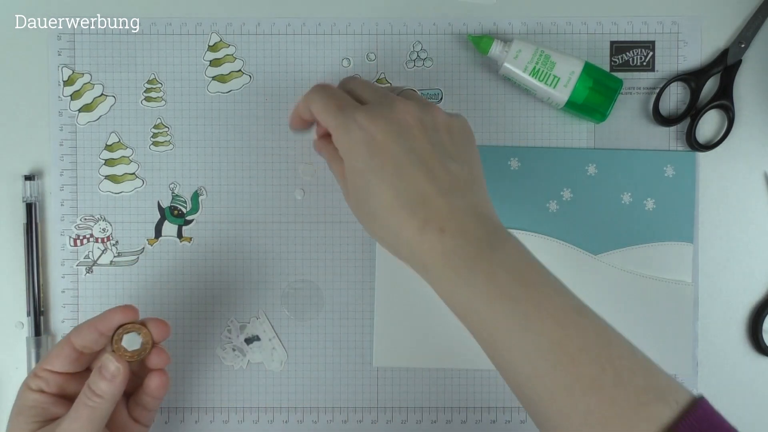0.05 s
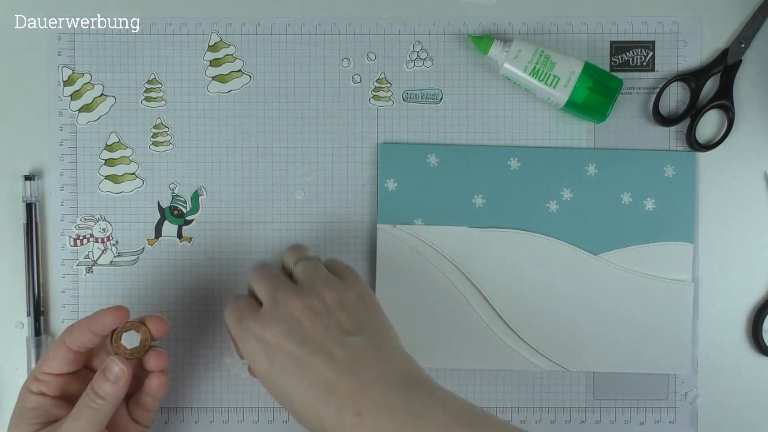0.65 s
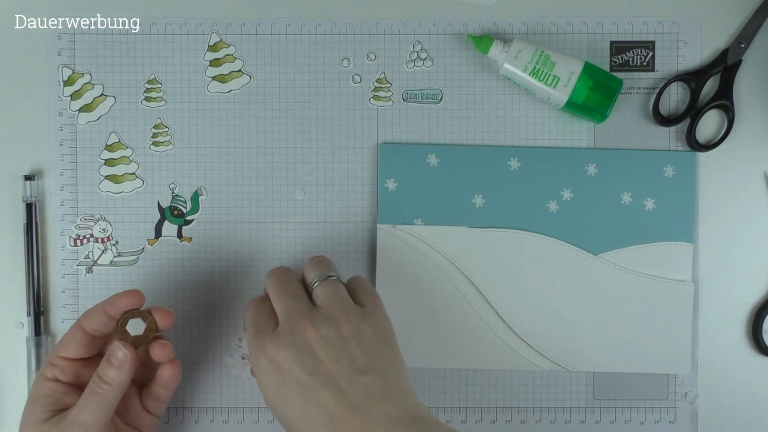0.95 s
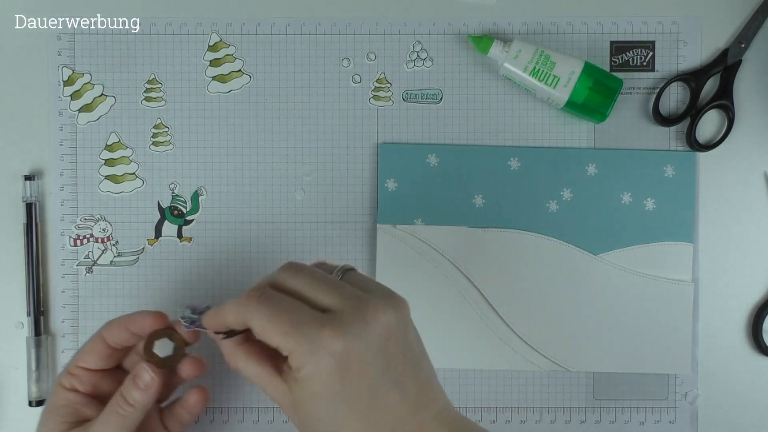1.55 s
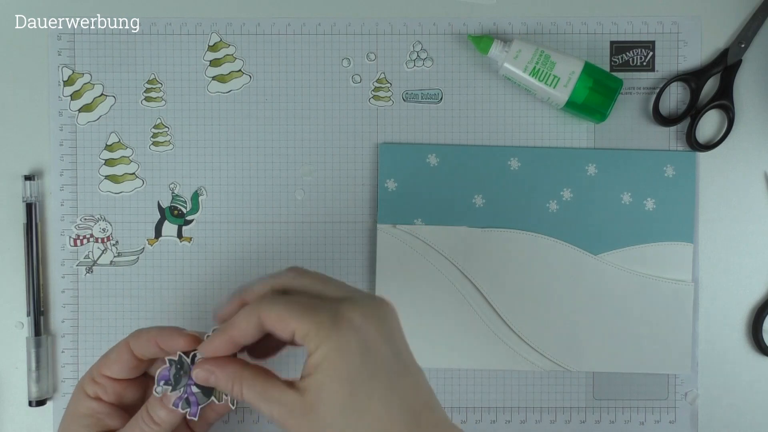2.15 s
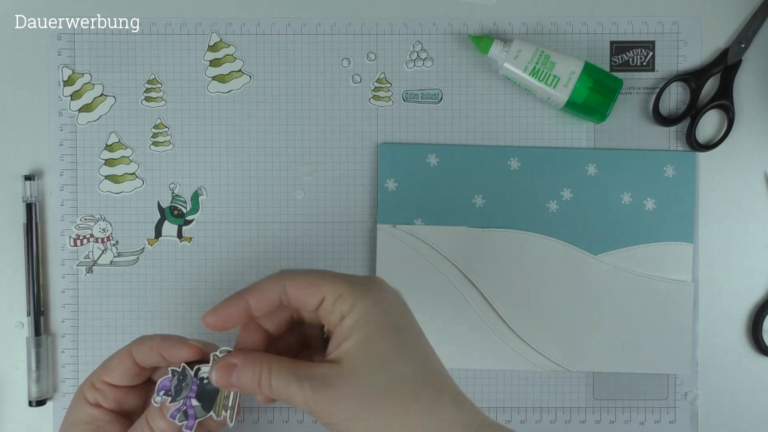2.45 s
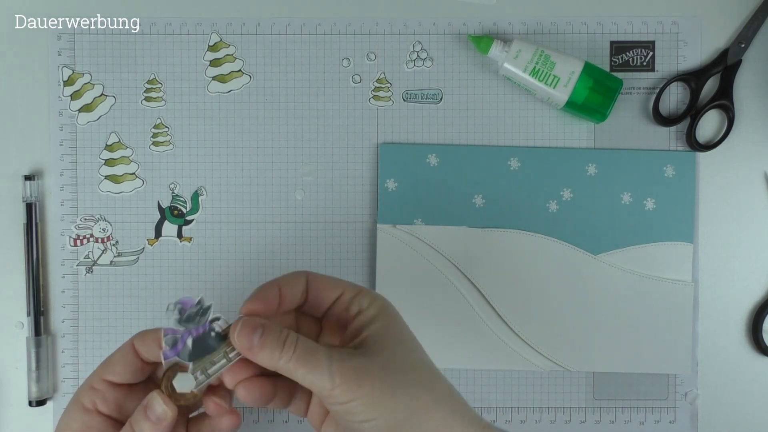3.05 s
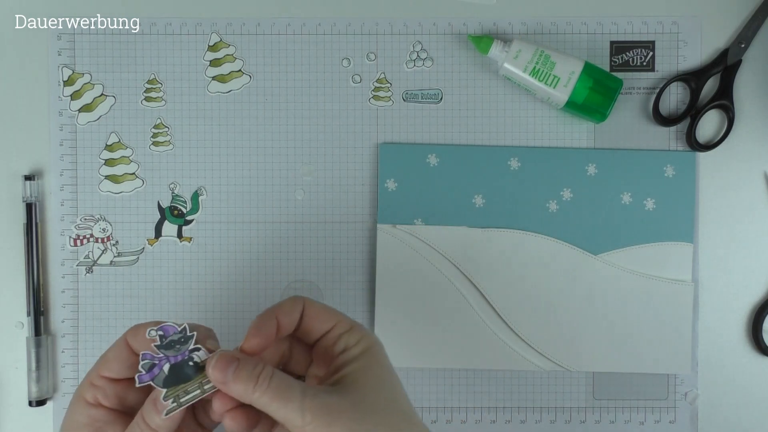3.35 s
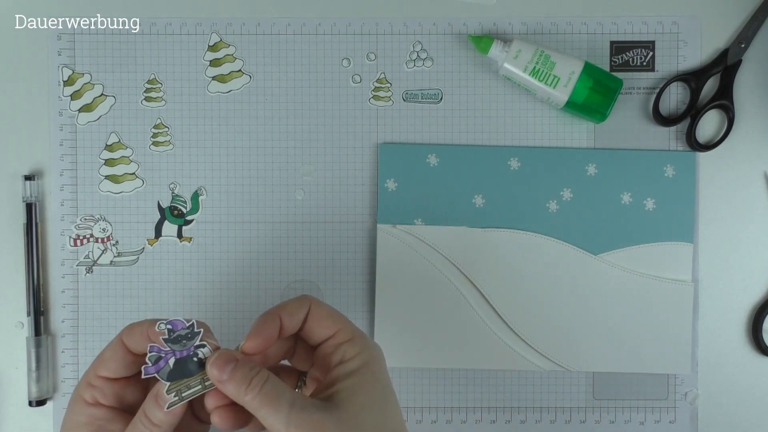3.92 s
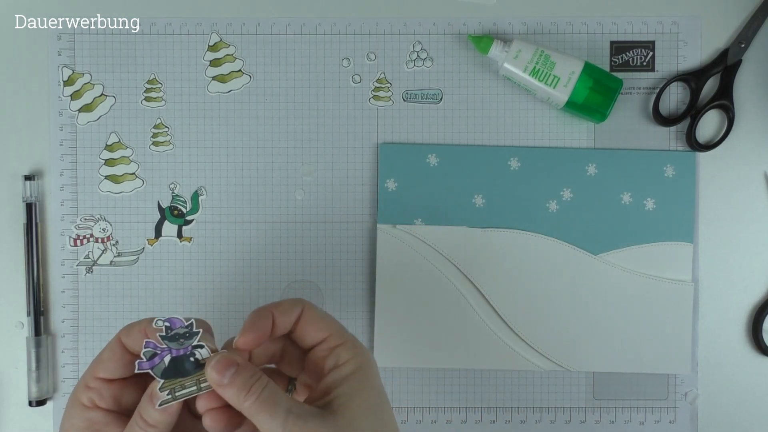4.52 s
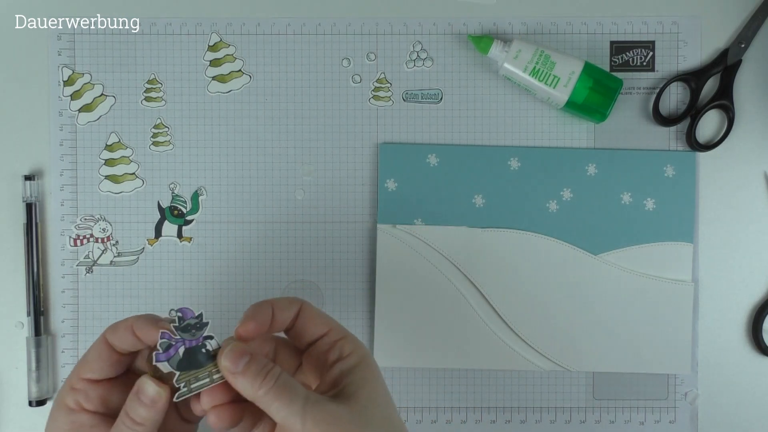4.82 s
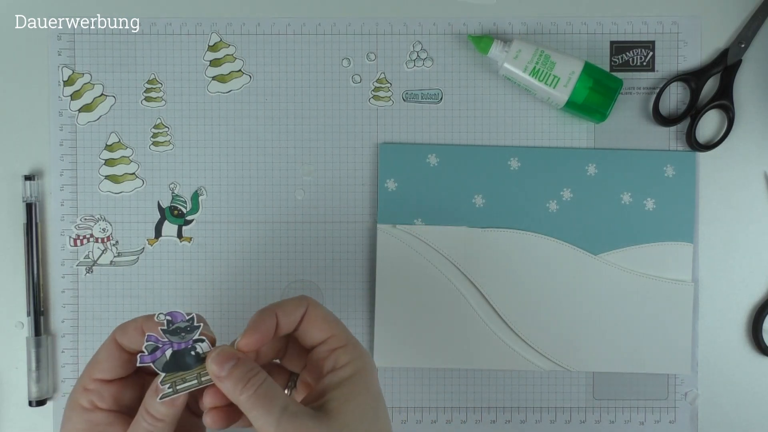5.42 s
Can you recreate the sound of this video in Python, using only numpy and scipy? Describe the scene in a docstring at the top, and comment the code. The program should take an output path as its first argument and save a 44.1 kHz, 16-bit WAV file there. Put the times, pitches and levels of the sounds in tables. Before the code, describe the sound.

A small piece of stiff card is handled up close in a quiet room with a faint low hum. First come dull fingertip thumps on the desk and two crisp snaps, the second louder. Then card and skin rub, tick and tap lightly, with further snaps. After a near-still stretch, a few sharp clicks land together with soft thuds.

```python
"""Card cutout on a craft mat

Close up, hands pick a small card cutout off a craft mat and press it onto a coin-sized disc.
Fingers bump and drag on the desk, card and skin rub, tick and tap, and the stiff card snaps
off a fingernail, ringing in its bending modes. Hands and desk scatter the card's sounds at once;
a small quiet room with a low rumble answers faintly."""
import sys
import numpy as np
from scipy import signal
from scipy.fft import rfft, irfft
from scipy.io import wavfile

SR = 44100
rng = np.random.default_rng(int(sys.argv[2]) if len(sys.argv) > 2 else 0)


def persist_wave(psi):
    """Save psi, clipped to +-1, as 16-bit WAV."""
    counts = np.round(np.clip(psi, -1, 1) * 32767).astype(np.int16)
    wavfile.write(sys.argv[1], SR, np.atleast_2d(counts).T)


N = 246078


def amp(db):
    """Decibels to gain."""
    return 10 ** (np.asarray(db) / 20)


def unit_rms(x):
    """Scales to an rms of one."""
    return x / np.sqrt(np.mean(x ** 2) + 1e-20)


def curve(points, hz):
    """Reads a curve along a log-frequency axis."""
    f, value = np.transpose(points)
    return np.interp(np.log(hz + 1), np.log(f + 1), value)


def add(mix, start_s, sound):
    """Drops a sound into the mix."""
    part = mix[round(start_s * SR):][:len(sound)]
    part += sound[:len(part)]


def bins(size=4096):
    """Frequencies on which the tone colours are drawn."""
    return np.fft.rfftfreq(size, 1 / SR)


def resonance(hz, centre, width):
    """Power response of one mode, one at its centre."""
    return (hz * width) ** 2 / ((hz ** 2 - centre ** 2) ** 2 + (hz * width) ** 2)


def impulse(power, size=2048):
    """The sharp-fronted (minimum-phase) click with this power spectrum."""
    log_gain = np.log(power / power.max() + 1e-9) / 2
    mirrored = np.concatenate([log_gain, log_gain[-2:0:-1]])
    spectrum = np.exp(np.conj(signal.hilbert(mirrored)))
    return irfft(spectrum[:len(power)])[:size]


def dulled(x, corner_hz):
    """Reflections lose their highest treble."""
    return signal.lfilter(*signal.butter(2, corner_hz, fs=SR), x)


def scattered_click(power, scatter_db, fade_s):
    """A click and its dense reflections off hands and desk."""
    click = impulse(power)
    t = np.arange(len(click)) / SR
    reflections = rng.choice([-1., 1.], len(t)) * (1 + t / fade_s) ** -1.5 * (t > .0004)
    echoes = dulled(signal.fftconvolve(click, reflections)[:len(t)], corner_hz=12000)
    sound = unit_rms(click) + amp(scatter_db) * unit_rms(echoes)
    return sound / np.linalg.norm(sound) * np.sqrt(SR / 1000)  # the energy of 1 ms at rms one


def cupped(x, echo_db=-4, fade_s=0.00096):
    """Reflections between cupped hands and desk; the hands move, so each stroke has its own ripple."""
    t = np.arange(512) / SR
    echoes = rng.standard_normal(len(t)) * np.exp(-t / fade_s) * (t > .0003)
    response = (t == 0) + amp(echo_db) * echoes / np.linalg.norm(echoes)
    return signal.fftconvolve(x, response / np.linalg.norm(response))


def friction(start, peak, end, slips_per_s, spread_db, hiss_gain, skew=1):
    """Tiny slips of uneven size over a smooth hiss, swelling to a peak and easing off."""
    t = np.arange(start, max(end, start + .005), 1 / SR)
    hiss = rng.standard_normal(N)[:len(t)]
    slipping = rng.random(N)[:len(t)] < slips_per_s / SR
    size = np.minimum(rng.standard_exponential(N)[:len(t)], 4)
    slips = np.sign(hiss) * slipping * amp(spread_db * size)
    ramp = np.interp(t, [start, peak, end], [0, 1, 0])
    speed = np.sin(np.pi / 2 * ramp ** skew) ** 2
    return unit_rms(unit_rms(slips) + hiss_gain * hiss) * speed


def through_body(force, power):
    """Plays a force through a body of the given power spectrum, keeping its level."""
    body = impulse(power)
    return signal.fftconvolve(force, body / np.linalg.norm(body))


# The room tone's colour. Each row: frequency in Hz, relative spectral level in dB.
ROOM_TONE_COLOUR = [(8.8, -24.5), (15, 3), (123, -10.5), (155, -10.5), (330, -18), (417, -19.5),
                    (483, -22.5), (628, -24), (685, -24.5), (1790, -32.5), (1960, -31.5), (2140, -32.5),
                    (4310, -36), (6110, -37.5), (16000, -44)]


def room_tone(level_db=-50.5):
    """A steady bed of room rumble and microphone hiss."""
    spectrum = rfft(rng.standard_normal(N)) * amp(curve(ROOM_TONE_COLOUR, bins(N)))
    return amp(level_db) * unit_rms(irfft(spectrum, N))


# The small room's decay. Each row: frequency in Hz, seconds to fall 60 dB.
ROOM_DECAY = [(200, 0.33), (1000, 0.28), (5000, 0.31), (9000, 0.33), (15000, 0.45)]


def room_reverb(x, build_s=0.0046):
    """A diffuse tail in which each band dies at its own speed."""
    hz, t, noise = signal.stft(rng.standard_normal(SR // 2), SR, nperseg=256)
    decay = amp(-60 * t / curve(ROOM_DECAY, hz)[:, None])
    tail = signal.istft(noise * decay, SR, nperseg=256)[1]
    tail *= np.minimum(np.arange(len(tail)) / SR / build_s, 1) ** 2
    return signal.fftconvolve(x, tail / np.linalg.norm(tail))[:N]


# The desk top's ring. Each row: frequency in Hz, relative level in dB, seconds to fall 60 dB.
DESK_RING = [(64.5, -12.5, .3), (104, -1.5, .07), (186.7, -2.5, 0.034), (262, -5, 0.093), (420, -1, .04)]
# Hands bump the desk. Each row: start in seconds, peak level in dB, contact time in seconds.
DESK_BUMPS = [(0.486, -28.5, 0.0019), (0.556, -35, 0.0034), (0.684, -32.5, 0.0006), (0.9432, -25, 0.00045),
              (1.01, -35, 0.0043), (1.2768, -28.5, 0.00021), (1.7820, -31.5, 0.00031),
              (4.706, -30.5, 0.00502), (4.74, -31, 0.0056)]


def desk_bumps():
    """Soft pushes ring the desk top; the longer the contact, the duller the thud."""
    out, t = np.zeros(N), np.arange(SR // 2) / SR
    ring = sum(amp(db - 60 * t / t60) * np.sin(2 * np.pi * f * t) for f, db, t60 in DESK_RING)
    for start, db, contact_s in DESK_BUMPS:
        push = t * np.exp(-4 * t / contact_s)
        thud = signal.fftconvolve(push, ring)[:len(t)]
        add(out, start, amp(db) * thud / abs(thud).max())
    return out


# The mat's body. Each row: frequency in Hz, width in Hz before widening, relative level in dB.
MAT_BODY = [(226.7, 53, -5.5), (405, 37, -0.5), (612, 120, -11.5), (940, 160, -15.5), (1155, 100, -14),
            (1750, 73, -11.5), (2230, 180, -15.5), (4134, 1300, -21.5)]
# Fingertip drags. Each row: start, peak and end in seconds, level in dB.
# A drag that peaks before its start comes in already fading.
FINGER_DRAGS = [(0.494, 0.52, 0.59, -48.5), (0.943, 0.86, 1.116, -41.5), (0.945, 0.99, 1.021, -38)]


def finger_drags(widening=2.1):
    """Dragging fingertips judder on the mat and sound its damped modes."""
    out, hz = np.zeros(N), bins()
    mat = sum(amp(db) ** 2 * resonance(hz, f, widening * width) ** 2 for f, width, db in MAT_BODY)
    for start, peak, end, db in FINGER_DRAGS:
        force = friction(start, peak, end, slips_per_s=870, spread_db=-0.5, hiss_gain=0.41)
        add(out, start, amp(db) * through_body(force, mat))
    return out


# The broad colour of rubbed card. Each row: frequency in Hz, relative spectral level in dB.
PAPER_COLOUR = [(150, -25.5), (350, -4), (700, -3.5), (1100, -3.5), (1900, -1), (2700, -3), (3400, -3.5),
                (5200, 1.5), (7900, -5), (9300, -10), (11300, -8), (13800, -16), (16000, -28.5)]


def paper(hz):
    """The papery power spectrum that all the card's sounds share."""
    return amp(curve(PAPER_COLOUR, hz)) ** 2


# Soft rubbing: a faint sleeve rustle first, then card slides and the hiss trailing the snaps.
# Each row: peak time, rise and fall in seconds, level in dB, pressure from 0 (light) to 1 (pressed).
SOFT_RUBS = [(.23, 0.056, 0.25, -66.5, 1), (0.641, 0.18, 0.089, -57.5, 0), (1.2, .054, 0.076, -57.5, 0.26),
             (1.28, 0.0097, 0.22, -40, 0.61), (1.685, 0.016, 0.042, -40.5, 0),
             (1.76, 0.08, 0.088, -50.5, 0.2), (1.902, 0.0032, 0.03, -44, 0.6),
             (1.962, 0.058, 0.092, -49.5, .12), (2.071, 0.047, 0.015, -48.5, 0),
             (2.152, .062, .024, -42.5, 0), (2.205, 0.035, 0.17, -54.5, 0.1), (2.369, 0.048, .06, -47.5, 0),
             (2.459, 0.035, 0.039, -50, .3), (2.513, 0.0022, 0.1, -48, 0.4),
             (2.734, 0.041, .166, -51.5, 0.63), (2.93, 0.063, 0.066, -56.5, 0.8),
             (3.074, .051, .116, -53.5, .4), (3.194, 0.036, .085, -58, .75), (3.35, 0.043, 0.029, -52, 0.8),
             (4.512, 0.16, .07, -66.5, .4)]


def soft_rubs(ring_q=2.2):
    """Fibres catch and slip; pressure dulls the hiss and brings out a ring."""
    out, hz = np.zeros(N), bins()
    for peak, rise_s, fall_s, db, pressure in SOFT_RUBS:
        tilt_db_per_octave = np.interp(pressure, [0, 1], [2.5, -4])
        ring_db = np.interp(pressure, [0, 1], [-3, 14])
        ring_hz = np.interp(pressure, [0, 1], [7200, 4800])  # the ring sinks under load
        tilt = amp(tilt_db_per_octave * np.log2(np.maximum(hz, 500))) ** 2
        ring = amp(ring_db) ** 2 * resonance(hz, ring_hz, ring_hz / ring_q)
        start = peak - rise_s
        force = friction(start, peak, peak + fall_s, slips_per_s=1300, spread_db=1.5, hiss_gain=0.99)
        rub = through_body(force, paper(hz) * tilt * (1 + ring))
        add(out, start, amp(db) * cupped(rub))
    return out


# The card lands softly on disc or finger. Each row: peak time in seconds, level in dB,
# rise in seconds, pitch in Hz, paper noise in dB against the upper mode.
CARD_TAPS = [(1.4121, -36, 0.0026, 1670, -10), (1.4805, -40.5, .004, 1487, -8.5),
             (1.549, -45, 0.00061, 1056, -19), (1.6925, -41, .008, 3000, -7),
             (1.783, -34, 0.0053, 1760, -2), (1.998, -36, .014, 1770, -4), (2.074, -44.5, .026, 2660, -18),
             (2.161, -37, 0.0093, 2600, 4), (2.935, -41.5, 0.0066, 2220, -6)]


def card_taps(fall_s=0.0091, overtone_ratio=2.07, mode_q=10, lower_db=1):
    """A cushioned landing is a quick cluster of slips that rings two finger-damped bending modes."""
    out, hz = np.zeros(N), bins()
    for peak, db, rise_s, pitch_hz, paper_db in CARD_TAPS:
        lower, upper = (resonance(hz, f, f / mode_q) for f in (pitch_hz, overtone_ratio * pitch_hz))
        power = amp(lower_db) ** 2 * lower + upper + amp(paper_db) ** 2 * paper(hz)
        start, end = peak - rise_s, peak + fall_s
        force = friction(start, peak, end, slips_per_s=2800, spread_db=3, hiss_gain=0.47, skew=0.71)
        add(out, start, amp(db) * cupped(through_body(force, power)))
    return out


def stray_ticks(count=30, per_s=1.2, relative_db=-43.5, spread_db=7, centre_hz=4950):
    """Cues for faint ticks that come by chance while the card is in hand."""
    wait, size, pitch = rng.random((count, 3)).T
    starts = np.cumsum(-np.log(1 - wait)) / per_s
    levels_db = relative_db + spread_db * (2 * size - 1)
    rings_hz = centre_hz * 2 ** ((pitch - .5) / 2)
    return [row for row in zip(starts, levels_db, rings_hz) if row[0] < N / SR]


# Clear ticks of card edge and nail. Each row: start in seconds, relative level in dB, ring in Hz.
EDGE_TICKS = [(.2311, -36, 4500), (.511, -40.5, 4500), (1.672, -27.5, 6700), (1.9015, -29.5, 5300),
              (2.0, -19.5, 5700), (2.0058, -22.5, 5900), (2.16, -24, 5200), (2.2214, -30, 5100),
              (2.5839, -26.5, 7200), (2.5913, -29.5, 6700), (2.6416, -26.5, 6330), (3.5056, -31, 4850),
              (3.5262, -34.5, 4500), (3.5345, -31.5, 4657), (3.7653, -43, 4900), (4.505, -40, 5050),
              (4.6297, -32.5, 5710), (4.6748, -31.5, 5200), (5.5668, -34.5, 4870)]


def edge_ticks(trim_db=-7, ring_q=11.0, papery_at_db=-15, papery_slope=0.696):
    """The card's edge catches: one ring over paper noise, purer the fainter the tick."""
    out, hz = np.zeros(N), bins()
    for start, db, ring_hz in list(EDGE_TICKS) + stray_ticks():
        paper_db = papery_slope * (db - papery_at_db)
        power = resonance(hz, ring_hz, ring_hz / ring_q) + amp(paper_db) ** 2 * paper(hz)
        add(out, start, amp(db + trim_db) * scattered_click(power, scatter_db=0, fade_s=0.003))
    return out


# The thin cut edge's sizzle. Each row: frequency in Hz, nominal width in Hz, relative level in dB.
CUT_EDGE_MODES = [(7500, 650, -1.5), (9300, 2800, -6), (9700, 3400, -6), (12900, 5800, -0.5)]
# The card snaps off a nail. Each row: start in seconds, relative level in dB, main ring in Hz,
# tautness (1 is usual), second panel mode in Hz, then flex, panel and edge in dB against the ring.
CARD_SNAPS = [(0.6853, -5, 6550, 0.82, 3700, -3, -6.5, -18),
              (1.2768, 5.5, 6060, 0.85, 3770, -11.5, -6.5, -13.5),
              (2.5089, -11.5, 7400, 1.07, 5070, -23, -16, -11), (2.5544, -20, 6100, 1.07, 3000, -5, 2.5, 3),
              (2.5647, -24, 6450, 1.2, 2920, -13, 3, 5), (2.8312, -4, 6100, 1.1, 2880, 5, 0, -10.5),
              (4.6985, 3, 4800, 1.16, 1650, -4.5, -3.5, -17.5),
              (4.7074, -7, 5270, 1.28, 6900, 3.5, -8, -19), (4.7357, -2.5, 5300, 0.78, 2390, -2, -5, -31)]


def card_snaps(trim_db=-7, crack_db=-11, ring_q=3.3, second_q=2.9, lowest_hz=340, highest_hz=13700):
    """The card springs free; the tauter it is, the higher its bending modes and the longer its ring."""
    out, hz = np.zeros(N), bins()
    # so small a card sends out no bass, and the release is too slow for the very top
    radiated = 1 / (1 + (lowest_hz / (hz + 1)) ** 8 + (hz / highest_hz) ** 20)
    for start, db, ring_hz, taut, second_hz, flex_db, panel_db, edge_db in CARD_SNAPS:
        second_db = panel_db + 7 * np.log2(second_hz / 3000)  # radiates 7 dB better per octave up
        modes = [(ring_hz, ring_hz / (ring_q * taut ** 2), 0),
                 (491 * taut, 282 * taut, flex_db),
                 (1930 * taut, 770 * taut, panel_db),
                 (second_hz, second_hz / second_q, second_db)]
        modes += [(f, width, edge_db + mode_db) for f, width, mode_db in CUT_EDGE_MODES]
        ringing = sum(amp(mode_db) ** 2 * resonance(hz, f, width) ** 2 for f, width, mode_db in modes)
        crack = amp(panel_db + crack_db) ** 2 * paper(hz)
        snap = scattered_click(radiated * (ringing + crack), scatter_db=-3, fade_s=.0014)
        add(out, start, amp(db + trim_db) * snap)
    return out


def scene(snap_send_db=-17, handling_send_db=-16, send_top_hz=8500):
    """Snaps up front, quieter handling behind, a touch of reverb and the room tone, in mono."""
    snaps = card_snaps()
    handling = edge_ticks() + card_taps() + soft_rubs() + desk_bumps() + finger_drags()
    send = amp(snap_send_db) * snaps + amp(handling_send_db) * handling
    reverb = room_reverb(dulled(send, send_top_hz))
    return (snaps + handling + reverb + room_tone())[None]


def record(dry):
    """Clips the tips of the loudest snaps, then cuts the very top of the treble."""
    clipped = np.clip(dry, -.88, .88)
    lowpass = signal.firwin(255, cutoff=15900, window=("kaiser", 9), fs=SR)
    return signal.oaconvolve(clipped, lowpass[None], "same")


dry = scene()
out = record(dry)
persist_wave(out)
```